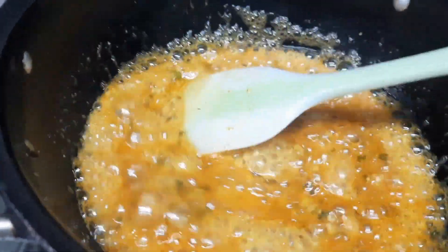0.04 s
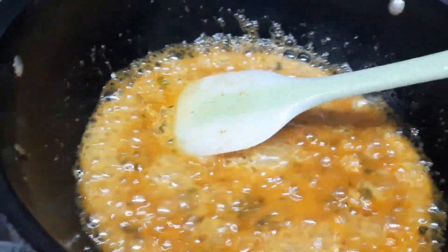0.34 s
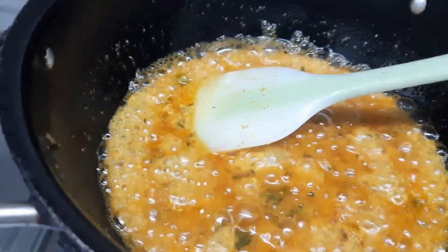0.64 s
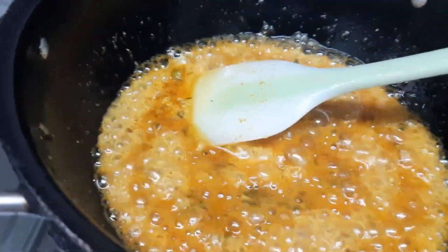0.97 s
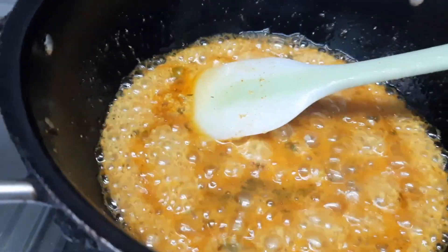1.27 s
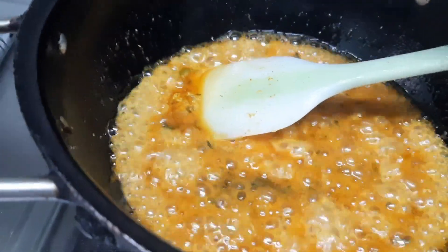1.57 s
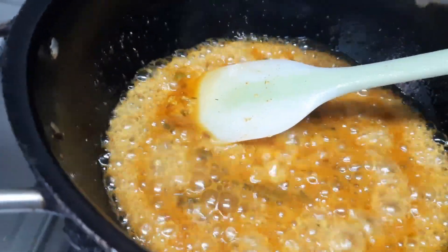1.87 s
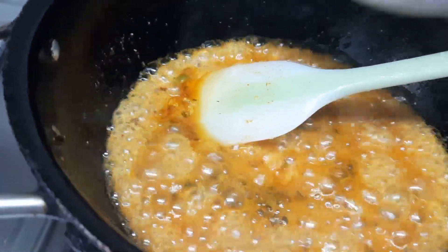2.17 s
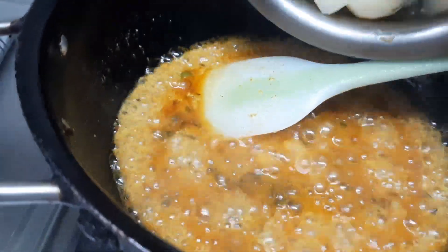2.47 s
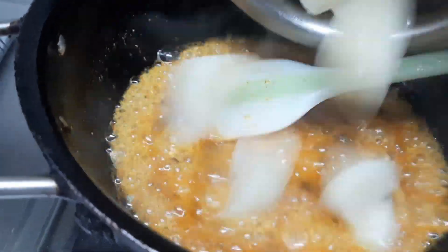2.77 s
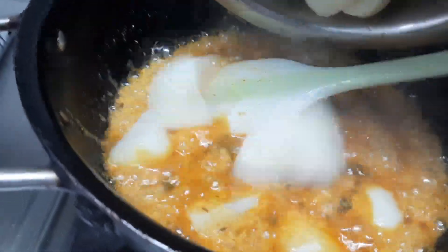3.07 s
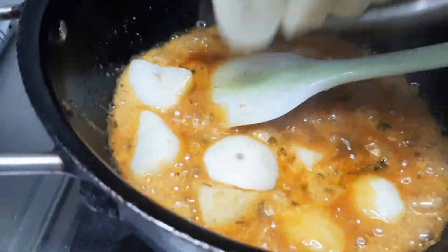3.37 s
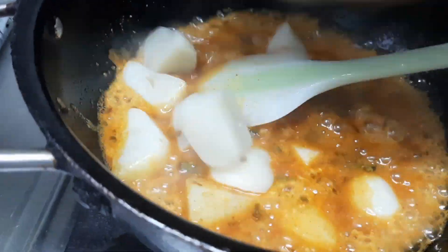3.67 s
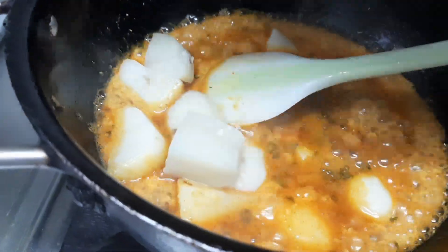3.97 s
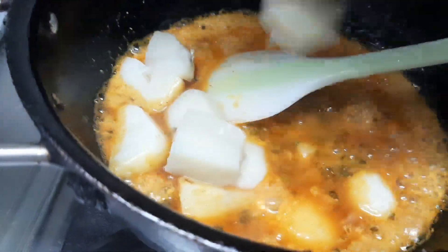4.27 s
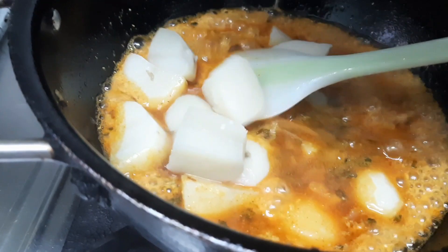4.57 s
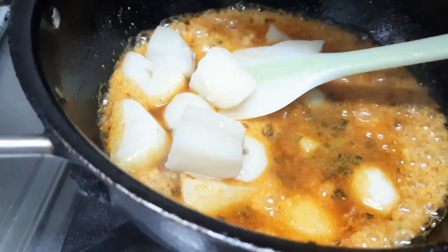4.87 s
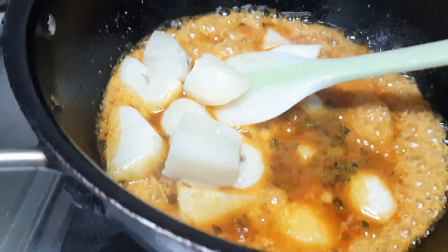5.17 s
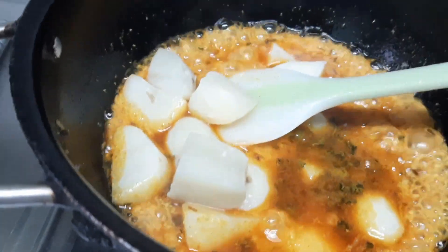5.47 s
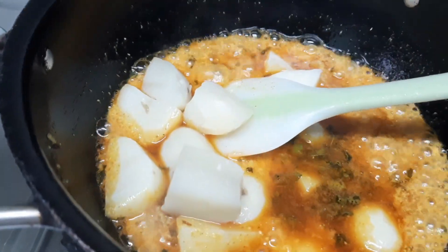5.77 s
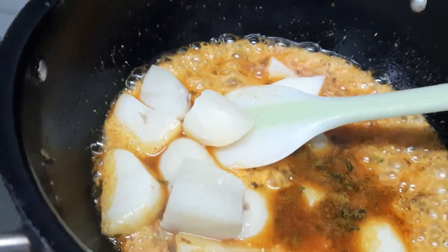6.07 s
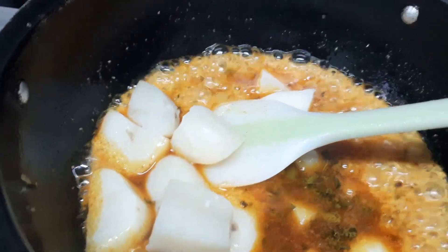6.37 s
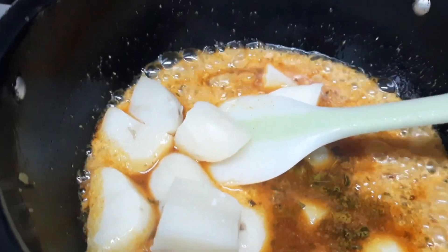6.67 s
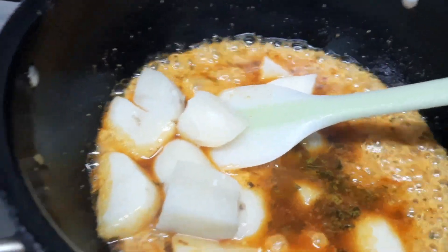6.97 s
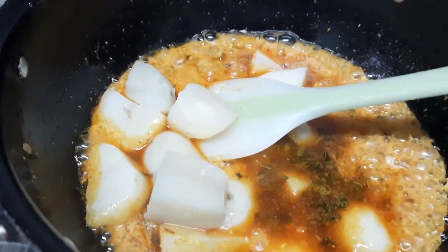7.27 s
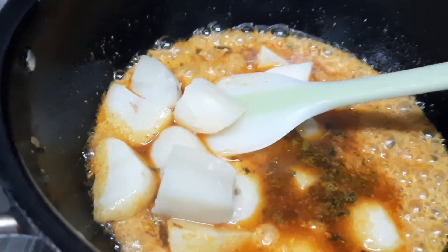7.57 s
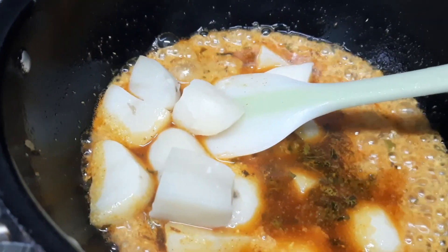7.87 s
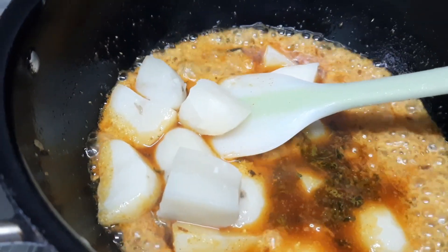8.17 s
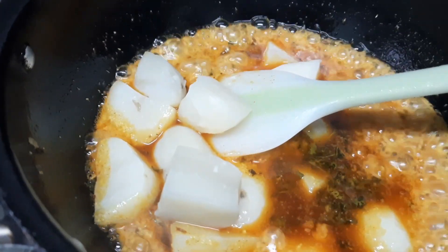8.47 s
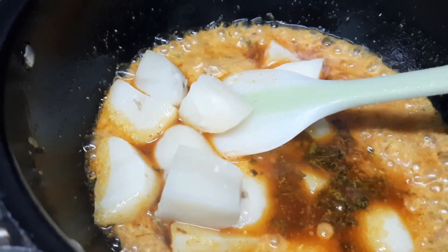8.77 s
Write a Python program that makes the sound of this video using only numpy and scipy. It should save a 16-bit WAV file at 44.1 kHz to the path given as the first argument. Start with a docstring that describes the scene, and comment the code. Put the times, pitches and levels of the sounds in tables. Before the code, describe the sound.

Heard from close to the pan in a small kitchen, a burner rumbles under thick gravy that bubbles, pops and lightly sizzles throughout. Kitchenware bumps the counter now and then. A cluster of potato pieces drops in with dull plops, knocks against a spatula and wet spits, followed by a few more pieces. After a faint steam whistle comes a hard thud from a bowl, and finally a brief, jerky scrape.

```python
"""Thick gravy simmers close by in a small kitchen: a rumbling stove, fine frying at the rim, and bubbles
bursting in soft, short pops. Kitchenware bumps the counter now and then. From 2.4 to 4.6 s potato pieces
plop in, rap the spatula and splash gravy onto the hot wall of the pan, where it spits. Steam whistles
faintly at 5.2 s, a bowl is put down hard at 6.2 s, and from 8.3 s something slides in a few short jerks."""
import sys
import numpy as np
from scipy import signal
from scipy.fft import rfft, irfft
from scipy.io import wavfile

SR = 44100
rng = np.random.default_rng(int(sys.argv[2]) if len(sys.argv) > 2 else 0)


def log_audio(samples):
    """Write samples as a 16-bit WAV file to the path given in sys.argv[1]."""
    # one column per channel
    frames = np.atleast_2d(samples).T
    # limit to full scale, then quantise
    limited = np.clip(frames, -1, 1)
    pcm = np.round(limited * 32767).astype(np.int16)
    wavfile.write(sys.argv[1], SR, pcm)


N = 388962
TIME, FREQS = np.arange(N) / SR, np.fft.rfftfreq(N, 1 / SR)

# how hard the gravy boils: time_s, level_db (table levels are relative; each layer adds its own gain)
BOIL_CURVE = [(0.0, -49.5), (0.32, -51.5), (1.5, -51), (2.15, -48.5), (3.3, -50.5), (4.1, -52), (5.9, -53),
              (6.4, -51), (7.3, -52), (7.85, -50), (8.82, -51.5)]


def gain_of(db):
    """Decibels to amplitude."""
    return 10 ** (np.asarray(db) / 20)


def unit_rms(x):
    """Scales to rms 1."""
    return x / np.sqrt(np.mean(x ** 2) + 1e-20)


def curve_at(points, hz):
    """Reads a curve along a logarithmic frequency axis."""
    point_hz, values = np.transpose(points)
    return np.interp(np.log(hz + 1), np.log(point_hz + 1), values)


def fader(points):
    """Turns (time_s, level_db) points into a gain for every sample."""
    time_s, level_db = np.transpose(points)
    return gain_of(np.interp(TIME, time_s, level_db))


def add(mix, start_s, sound):
    """Mixes a sound in at its start time."""
    part = mix[max(round(start_s * SR), 0):][:len(sound)]
    part += sound[:len(part)]


def colour(x, spectrum, resonances=()):
    """EQ: a smooth (freq_hz, gain_db) curve with (freq_hz, width_hz, boost_db) peaks on top."""
    peaks_db = sum(boost / (1 + (2 * (FREQS - hz) / width) ** 2) for hz, width, boost in resonances)
    return irfft(rfft(x) * gain_of(curve_at(spectrum, FREQS) + peaks_db), N)


def band(x, hz, width_hz):
    """A steep resonance: a band-pass applied twice, brought to rms 1."""
    b, a = signal.iirpeak(hz, hz / width_hz, SR)
    return unit_rms(signal.lfilter(b, a, signal.lfilter(b, a, x)))


def crackle(per_s, spread_db, size=N):
    """Randomly timed clicks of random sign, mostly small and a few large."""
    chance, clicks = rng.random(size) * SR / per_s, np.zeros(size)
    at = np.flatnonzero(chance < 1)
    clicks[at] = (-1.) ** at * gain_of(spread_db * np.minimum(-np.log(chance[at]), 4))
    return clicks


def bubble(hz, cycles, glide=0.062):
    """A bursting bubble's cavity: thick gravy damps it to 1/e in `cycles`, while its pitch rises."""
    turns = np.arange(round(SR * 7 * cycles / hz) + 2) * hz / SR
    age = turns / cycles
    envelope = (1 - np.exp(-(2 * turns) ** 2)) * np.exp(-age)
    wave = envelope * np.sin(2 * np.pi * turns * (1 + glide * np.tanh(age / 2)))
    return wave / abs(wave).max()


def kitchen(x, wall_db, room_db, wall_s=0.0036, lag_s=0.00018):
    """Direct sound, later and duller on the right, then quick wall echoes and the room's tail."""
    # the room's decay: freq_hz, t60_s
    reverb_times = [(100, 0.21), (400, 0.65), (1000, 0.37), (3000, 0.5), (12000, 0.58)]
    size = SR // 2
    t = np.arange(size) / SR
    taps = rng.choice([-1., 1.], (2, size)) * (rng.random((2, size)) < 3000 / SR)
    walls = taps * (t > .0015) * np.exp(-t / wall_s)
    hz, age, late_taps = signal.stft(taps * (t > .011), SR, nperseg=256)
    decay = gain_of(-60 * age / curve_at(reverb_times, hz)[:, None])
    tail = signal.istft(late_taps * decay, SR, nperseg=256)[1][:, :size]
    echoes = (gain_of(wall_db) * unit_rms(walls) + gain_of(room_db) * unit_rms(tail)) / np.sqrt(size)
    right = colour(np.interp(TIME - lag_s, TIME, x), [(700, 0), (2000, -7)])
    return np.array([x, right]) + signal.fftconvolve(x[None], echoes, axes=1)[:, :N]


def shaded(stereo, share=1):
    """The right side faces away from the stove and loses treble, less so for sounds beside the pan."""
    # right against left: freq_hz, gain_db
    shadow = [(40, -5.5), (90, 3), (250, -1.5), (450, -0.5), (650, -4), (900, -7.5), (1250, -6),
              (1600, -13.5), (2300, -18.5), (3100, -25.5), (4200, -12), (7500, -3.5), (13000, -14.5)]
    left, right = stereo
    return np.array([left, colour(right, [(hz, share * db) for hz, db in shadow])])


def stove(rumble_db=-32, rumble_share=.24, drone_db=-1, drone_hz=110.5, lag_s=0.00017):
    """The burner's rumble booms in the hollow under the pan; one low note swells and fades."""
    # the low note's swell, which the rumble follows by rumble_share dB per dB: time_s, level_db
    swell_curve = [(0.0, -46), (0.18, -50), (0.38, -57), (1.5, -54.5), (1.85, -45.5), (2.4, -47),
                   (3.3, -52.5), (3.53, -41.5), (3.75, -52), (4.3, -50), (5.3, -52.5), (6.1, -51.5),
                   (6.55, -44.5), (7.42, -57), (7.73, -41.5), (8.08, -62), (8.33, -45.5), (8.82, -55)]
    # the burner's tone: freq_hz, gain_db
    rumble_eq = [(20, -31), (35, -8.5), (55, 0), (90, -7.5), (140, 1), (190, -2.5), (330, 0.5), (470, -4),
                 (650, -14.5), (1100, -28), (2000, -34), (4000, -50)]
    # resonances under the pan: freq_hz, width_hz, boost_db
    hollow = [(76.2, 15.8, 13), (152.6, 21.7, 8), (262.8, 4.5, 12), (410, 7.6, 10.5), (622, 17, 7)]
    # how alike the rumble is left and right: freq_hz, coherence (0-1)
    likeness = [(50, 0.87), (130, 0.93), (215, 0.78), (400, 0.96), (650, 0), (1200, 0.5), (2000, 0.2)]
    left, independent, drone_noise = rng.standard_normal((3, N))
    coherence = np.clip(curve_at(likeness, FREQS), 0, 1)
    right_spectrum = coherence * rfft(left) + np.sqrt(1 - coherence ** 2) * rfft(independent)
    right = irfft(right_spectrum * np.exp(-2j * np.pi * FREQS * lag_s), N)
    rumble = unit_rms(colour(np.array([left, right]), rumble_eq, hollow))
    drone = band(drone_noise, drone_hz, width_hz=12)
    drone = unit_rms(drone / np.sqrt(abs(signal.hilbert(drone)) + 1e-9))  # 2:1 compression steadies it
    swell = fader(swell_curve)
    return gain_of(rumble_db) * swell ** rumble_share * rumble + gain_of(drone_db) * swell * drone


def steam_whistle(start_s=5.18, end_s=5.38, pitch_hz=3500, level_db=-62.5):
    """A thin, fluttering whistle of steam through a pinhole."""
    out, size = np.zeros(N), round((end_s - start_s) * SR)
    tone = band(rng.standard_normal(size), pitch_hz, width_hz=90)
    add(out, start_s, tone * signal.windows.tukey(size, .3))
    return gain_of(level_db) * out


def sizzle(frying_gain_db=14, spit_gain_db=-3, flare_gain_db=12, attack_s=0.00028, puff_s=.001):
    """Fine frying at the rim; where gravy meets hot metal it spits and the frying flares up."""
    # the bed of frying: time_s, level_db
    frying_curve = [(0.0, -73.5), (0.56, -76.5), (1.62, -76), (1.82, -74.5), (3.04, -73.5), (3.32, -76.5),
                    (3.73, -73.5), (3.91, -78.5), (5.6, -79.5), (6.48, -76.5), (7.35, -79.5), (8.3, -76.5),
                    (8.42, -75), (8.82, -78)]
    # gravy thrown on the hot wall: start_s, spit_db, flare_db, decay_s
    splashes = [(2.19, -67, -63.5, .012), (2.565, -39, -70, 0.0055), (2.737, -51, -63, 0.0075),
                (2.845, -47, -64, 0.057), (2.885, -58, -64, 0.043), (3.53, -54, -77, .015),
                (3.559, -37, -58, .007), (3.572, -39, -70, .007), (3.622, -41, -61, 0.0067),
                (3.645, -49, -74, 0.034), (3.68, -53, -81, 0.025), (4.419, -50, -67, 0.032),
                (4.608, -43, -80, 0.0098), (6.225, -57, -82, 0.086), (6.52, -40.5, -75, 0.027),
                (6.5747, -39, -63, 0.024), (8.5067, -31, -72, .002), (8.519, -53, -56, 0.0043)]
    # the tone of frying: freq_hz, gain_db
    frying_eq = [(1500, -29.5), (3500, 7), (5000, -15), (6500, -11), (7400, -25), (9500, -14),
                 (12000, -5.5), (14000, -4.5), (15500, 1)]
    # the tone of a wet spit: freq_hz, gain_db
    spit_eq = [(700, -15), (1500, 18), (3200, 16.5), (4000, 9.5), (4700, -3.5), (5500, -6), (7500, -24),
               (10000, -25), (13000, -9), (15500, -13)]
    # each tiny droplet boils off in a sudden puff that dies within milliseconds
    puffs = signal.lfilter([1], [1, -np.exp(-1 / (puff_s * SR))], crackle(900, spread_db=5.1) ** 2)
    fizz = np.sqrt(puffs / puffs.mean() + 1.1) * rng.standard_normal((2, N))
    spits, flares, t = np.zeros(N), np.zeros(N), np.arange(SR // 3) / SR
    for start_s, spit_db, flare_db, decay_s in splashes:
        boil_off = (1 - np.exp(-t / attack_s)) * np.exp(-t / max(decay_s, .002))
        add(spits, start_s, gain_of(spit_db + spit_gain_db) * boil_off)
        add(flares, start_s, gain_of(flare_db + flare_gain_db) * boil_off)
    frying = np.hypot(gain_of(frying_gain_db) * fader(frying_curve), flares)
    return frying * unit_rms(colour(fizz, frying_eq)) + spits * unit_rms(colour(fizz, spit_eq))


def slide(hiss_db=5):
    """Something slides: tiny slips excite a rasp and a wide band of grit with a thin hiss on top."""
    # jerks of the slide: start_s, length_s, level_db, rasp_hz, grit_db (against the rasp)
    jerks = [(8.26, 0.06, -45.5, 1680, 3), (8.327, 0.036, -42.5, 900, 0), (8.392, 0.047, -41.5, 1690, -5),
             (8.436, 0.077, -49, 1580, -15), (8.531, 0.056, -43.5, 1590, -11)]
    # resonances of the sliding thing: freq_hz, width_hz, boost_db
    resonances = [(920, 70, 3), (1470, 70, 3), (1860, 70, 4), (2200, 140, 3.5)]
    out = np.zeros(N)
    for start_s, length_s, level_db, rasp_hz, grit_db in jerks:
        size = round(length_s * SR)
        slips = crackle(1500, spread_db=1.8, size=size)
        grit = band(slips, 2200, width_hz=2800) + gain_of(hiss_db) * band(slips, 15000, width_hz=6000)
        scrape = band(slips, rasp_hz, width_hz=950) + gain_of(grit_db) * grit
        add(out, start_s, gain_of(level_db) * scrape * signal.windows.tukey(size, .55))
    dull = colour(out, [(3000, -0.5), (5000, -15.5), (8000, -29)], resonances)
    return kitchen(dull, wall_db=-2.5, room_db=-0.5)


def counter_bumps(push_db=7, rattle_db=-33, clatter_db=-11, clatter_s=0.058, clatter_rise_s=0.0035):
    """A blow pushes the counter and rings its modes; the softer the blow, the fewer it reaches."""
    # kitchenware set down, or a piece hitting the pan's bottom: start_s, level_db, cutoff_hz
    blows = [(1.768, -31, 480), (2.731, -38, 420), (3.494, -35, 264), (4.6000, -25, 500),
             (6.2057, -5.5, 1000), (6.219, -23, 970), (6.520, -32, 320), (7.699, -39, 280),
             (8.46, -34, 375), (8.493, -35, 347)]
    # modes of the counter and what stands on it: pitch_hz, level_db, t60_s
    modes = [(108.1, -15, 0.65), (168.3, -12, 0.37), (226, -5.5, 0.07), (265.4, -9, 0.22),
             (403.7, -6, 0.21), (498, -8.5, .2), (547, -15, 0.31), (619, -26, 0.14), (702, -7.5, 0.16),
             (824, -3.5, 0.093), (890, -11.5, 0.29), (904, -11, 0.2), (970, -6, 0.15), (1072, -12, 0.12)]
    out, t = np.zeros(N), np.arange(SR * 3 // 4) / SR
    body = sum((-1) ** k * gain_of(db - 60 * t / t60) * np.sin(2 * np.pi * hz * t)
               for k, (hz, db, t60) in enumerate(modes))
    add(body, 0, gain_of(push_db) * bubble(480, cycles=.45))  # the push: one heavily damped swing
    for start_s, level_db, cutoff_hz in blows:
        # countless weak modes blur into a short noisy clatter
        clatter = band(rng.standard_normal(len(t)), 520, width_hz=1300)
        clatter *= (1 - np.exp(-t / clatter_rise_s)) * np.exp(-t / clatter_s)
        lowpass = signal.butter(6, cutoff_hz, fs=SR, output="sos")
        thud = signal.sosfilt(lowpass, body + gain_of(clatter_db) * clatter)
        rattle = band(rng.standard_normal(len(t)), 1600, width_hz=1700) * np.exp(-t / 0.018)
        add(out, start_s, gain_of(level_db) * (thud / abs(thud).max() + gain_of(rattle_db) * rattle))
    eq = [(50, -26), (100, 2.5), (950, 0.5), (1300, 4.5), (1800, 8), (3200, 6), (5000, -13),
          (9000, -49.5)]
    return kitchen(colour(out, eq), wall_db=-14, room_db=-12)


def spatula_knocks():
    """Falling potato pieces rap the spatula and bounce."""
    # the strikes: start_s, level_db
    strikes = [(2.793, -30), (2.8068, -16.5), (2.8122, -22), (2.889, -33), (2.905, -34), (3.571, -31)]
    # modes of the spatula against the pan: pitch_hz, level_db, t60_s
    modes = [(1116, -12, 0.16), (1105, 14, 0.042), (1420, 12, 0.024), (1790, 7, 0.018), (2290, 4, 0.024)]
    out, t = np.zeros(N), np.arange(SR // 10) / SR
    rap = sum(gain_of(db - 60 * t / t60) * np.sin(2 * np.pi * hz * t) for hz, db, t60 in modes)
    for start_s, level_db in strikes:
        add(out, start_s, gain_of(level_db) * rap / abs(rap).max())
    return kitchen(colour(out, [(2500, 2.5), (3200, -14), (6000, -43)]), wall_db=-22, room_db=-18)


def potato_plops(slap_hz=1340, slosh_s=0.035, spray_db=-13, spray_s=0.026):
    """Each piece slaps the gravy and punches a dull cavity, which sloshes shut; spray patters back."""
    # pieces landing: start_s, level_db, cavity_hz, slosh_db, slap_db (both against level_db)
    landings = [(2.37,-34.5,430,-2,-2), (2.739,-29,360,-5.5,2.5), (2.746,-44,298,-2,-2),
                (2.774,-33,300,-9,-20), (2.8083,-21.5,444,-11.5,-21), (2.850,-33.5,398,-14,10),
                (2.873,-34,263,-8,0), (2.888,-26.5,293,-9,-6), (2.913,-30.5,343,-17,-5),
                (2.947,-35,400,-8,2), (3.048,-21,514,-19,-12.5), (3.528,-33.5,430,-9,1),
                (3.562,-29,446,-16,-8), (3.5696,-24.5,410,-21,-6), (3.622,-32.5,397,-11,-1),
                (3.764,-36,325,-5.5,0), (4.6024,-26.5,320,-18,-14), (4.609,-27.5,360,-11,-8)]
    out, t = np.zeros(N), np.arange(SR // 5) / SR
    for start_s, level_db, cavity_hz, slosh_db, slap_db in landings:
        add(out, start_s, gain_of(level_db) * bubble(cavity_hz, cycles=0.51))
        add(out, start_s, gain_of(level_db + slap_db) * bubble(slap_hz, cycles=1))
        slosh = band(crackle(2500, spread_db=1, size=len(t)), cavity_hz, width_hz=600)
        add(out, start_s, gain_of(level_db + slosh_db) * slosh * np.exp(-t / slosh_s))
        spray = band(crackle(700, spread_db=3.4, size=len(t)), 1200, width_hz=1030)
        add(out, start_s, gain_of(level_db + slap_db + spray_db) * spray * np.exp(-t / spray_s))
    dull = colour(out, [(60, 1), (200, 2.5), (1500, 2), (3000, 13), (5000, -31)])
    return kitchen(dull, wall_db=-14, room_db=-14)


def simmer(gain_db=3):
    """A froth of small bubbles, each size with its own pitch, heard through the air in the pan."""
    # the froth's tone: freq_hz, gain_db
    froth_eq = [(250, -8.5), (550, 2), (800, -2), (1000, -1), (1300, -3), (1900, -5), (2550, -1.5),
                (3000, -4), (3500, -9), (4000, -18), (5000, -29.5), (8000, -65)]
    # resonances of the air in the pan: freq_hz, width_hz, boost_db
    pan_air = [(910, 220, 3), (1115, 60, 4), (1553, 450, 10), (2190, 380, 8)]
    froth = np.zeros(N)
    for hz in np.geomspace(400, 4500, num=24):
        bursts = crackle(per_s=80 * hz / 1500, spread_db=0.5)  # smaller bubbles burst more often
        froth += np.sqrt(hz) * signal.oaconvolve(bursts, bubble(hz, cycles=1.43))[:N]
    in_room = kitchen(colour(froth, froth_eq, pan_air), wall_db=-16, room_db=-4)
    return gain_of(gain_db) * fader(BOIL_CURVE) * unit_rms(in_room)


def stray_bubbles(per_s=22, above_boil_db=5, range_db=6, centre_hz=1465, scatter_octaves=0.4):
    """Rows for bubble_pops: middling bubbles that burst at random, louder as the boil grows."""
    strays, boil = [], fader(BOIL_CURVE)
    for when, size, ringing, film in rng.random((round(per_s * N / SR), 4)):
        level_db = above_boil_db + 20 * np.log10(boil[int(when * N)]) + range_db * size ** 2
        pitch_hz = centre_hz * 2 ** (scatter_octaves * rng.standard_normal())
        strays.append((when * N / SR, level_db, pitch_hz, 0.22 + 3.6 * ringing ** 2, -20 + 14 * film))
    return strays


def bubble_pops(gain_db=7, film_hz=2342, gulp_db=-13, echo_db=-8, neighbour_db=-8, neighbour_s=.02):
    """Large bubbles burst: the film snaps, the cavity rings and the gravy gulps shut."""
    # the largest bursts: start_s, level_db, pitch_hz, ring_cycles, film_db (against the cavity)
    big_bubbles = [(0.045,-36.5,2460,5,-18), (0.048,-38,1120,2,-16), (0.221,-41,1310,1.2,-6),
                   (0.368,-39,1430,1.1,-6), (0.648,-44,215,1.6,-30), (0.859,-43,950,1.8,-14),
                   (1.522,-34.5,1700,3.1,-23), (1.629,-32,1630,0.44,-27), (1.936,-38,2330,2.1,-22),
                   (1.986,-35,1850,1.8,-20), (2.017,-30,1530,2.2,-0.5), (2.18,-38,1530,.9,-18),
                   (2.342,-34,1250,1.1,-13), (2.563,-27.5,1270,1.6,-14), (2.959,-31,1330,.8,-11),
                   (3.302,-30,1380,0.89,-24), (3.405,-33,1400,0.81,-12), (3.412,-34,1580,.5,-17),
                   (3.642,-27.5,1910,1.4,-0.5), (3.854,-33,1390,1.6,-17), (4.03,-37,1430,1.1,-24),
                   (4.157,-37,1430,1.4,-10), (4.2425,-41,2740,0.7,-14), (4.343,-34,1210,1.4,0.5),
                   (4.415,-31,1300,0.71,-7), (4.658,-36,1360,2.4,-19), (4.8445,-36.5,2980,3.6,-19),
                   (4.8455,-35,990,.7,-14), (4.867,-39.5,1640,1.4,-16), (4.977,-34,1090,0.52,-8),
                   (5.143,-37,1470,3,-18), (5.201,-38,1490,1.2,-6), (5.369,-38,950,2.9,-25),
                   (5.463,-35,950,0.46,-10.5), (5.547,-36.5,1240,.7,-10), (5.9304,-36,1210,1.4,-17),
                   (5.971,-35.5,2460,2.2,-12), (6.521,-32,1730,0.97,-10), (6.576,-31,1480,.45,-11),
                   (6.609,-35,1330,1.4,-12), (6.937,-39.5,1370,3.1,-17), (6.995,-37,835,1.5,-24),
                   (7.043,-34,1250,0.69,-19), (7.131,-37.5,1620,0.46,-4), (7.2735,-37.5,930,.6,6),
                   (7.357,-47,970,2.5,-18), (7.724,-32,1440,0.44,-10), (7.989,-36.5,1520,0.44,-9),
                   (8.5058,-31,1080,0.6,-14)]
    out = np.zeros(N)
    for start_s, level_db, pitch_hz, ring_cycles, film_db in list(big_bubbles) + stray_bubbles():
        pop = np.zeros(SR // 10)
        add(pop, 0, bubble(pitch_hz, max(ring_cycles, .5)))
        add(pop, 0, gain_of(film_db) * bubble(film_hz, cycles=3))
        add(pop, 0, gain_of(gulp_db) * bubble(pitch_hz / 3.18, cycles=1))
        add(out, start_s, gain_of(level_db) * pop)
        for delay_s in rng.uniform(.002, .012, size=3):  # echoes off the wall
            add(out, start_s + delay_s, gain_of(level_db + echo_db) * np.exp(-delay_s / 0.012) * pop)
        for late, detune in rng.random((3, 2)):  # each burst sets off three weaker neighbours
            octaves = 0.48 * (2 * detune - 1)
            neighbour = np.exp(-late) * bubble(pitch_hz * 2 ** octaves, cycles=1.2)
            add(out, start_s + late * neighbour_s, gain_of(level_db + neighbour_db) * neighbour)
    eq = [(200, 7.5), (700, 1), (2700, 2.5), (3600, 0), (4300, -8.5), (5000, -22), (8000, -39)]
    return gain_of(gain_db) * kitchen(colour(out, eq), wall_db=-15, room_db=-11)


def scene():
    """The pan on the stove, with the bumps and the slide beside it, in stereo."""
    pan = (stove() + simmer() + bubble_pops() + potato_plops() + spatula_knocks()
           + sizzle() + steam_whistle())
    return shaded(pan) + shaded(counter_bumps(), share=0.52) + shaded(slide(), share=.6)


def record(dry):
    """A steep low-pass trims the highest treble."""
    lowpass = signal.firwin(511, cutoff=15850, window=("kaiser", 9), fs=SR)
    return signal.oaconvolve(dry, lowpass[None], "same")


dry = scene()
out = record(dry)
log_audio(out)
```